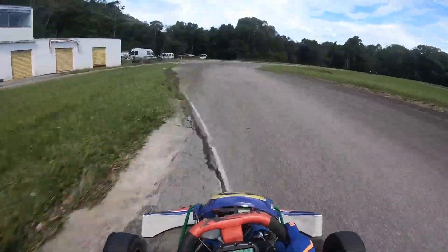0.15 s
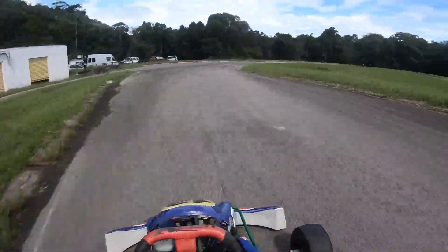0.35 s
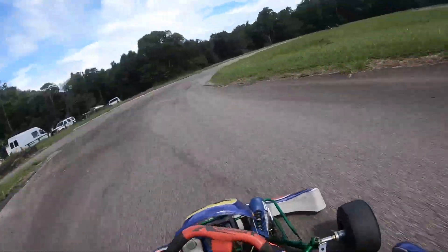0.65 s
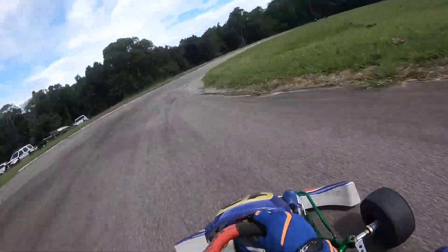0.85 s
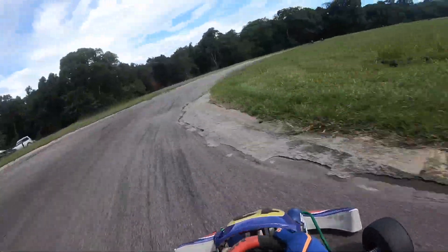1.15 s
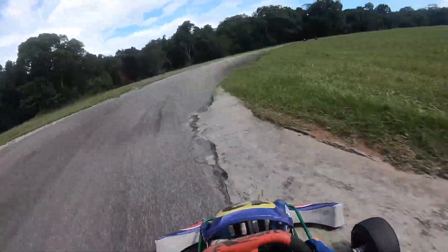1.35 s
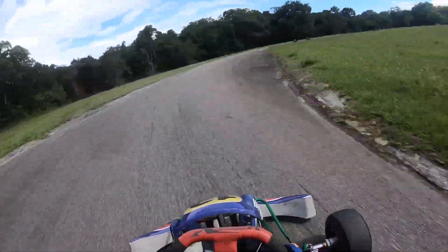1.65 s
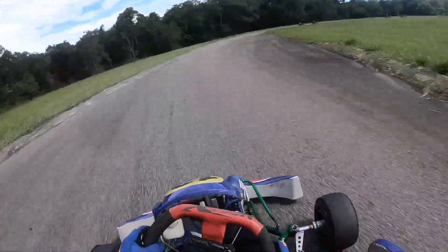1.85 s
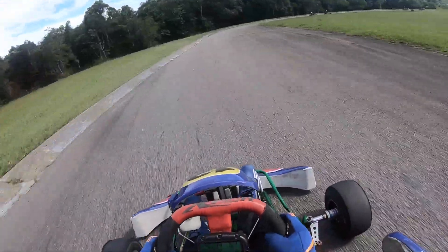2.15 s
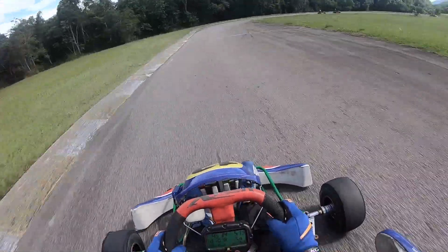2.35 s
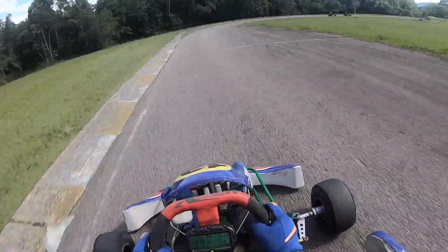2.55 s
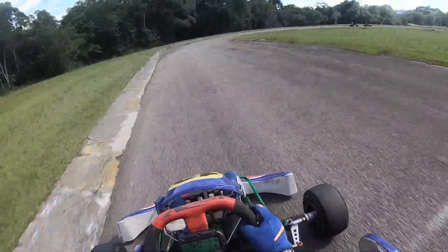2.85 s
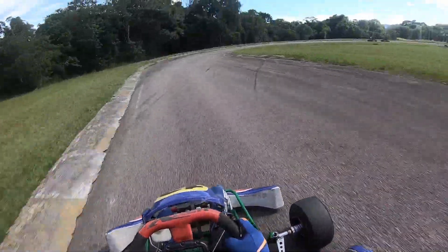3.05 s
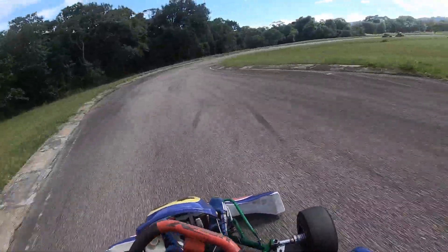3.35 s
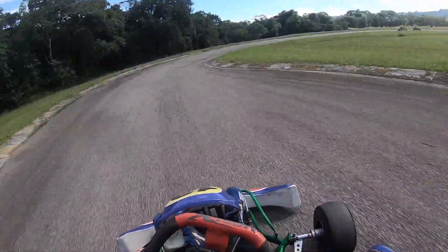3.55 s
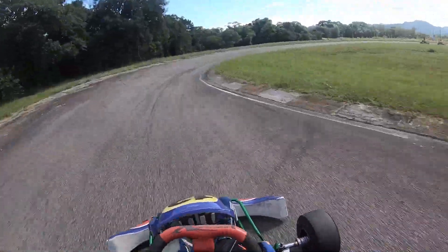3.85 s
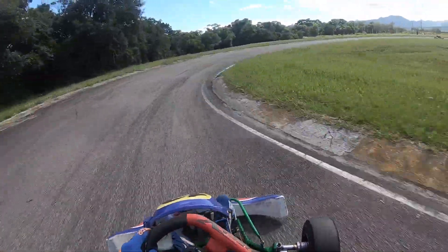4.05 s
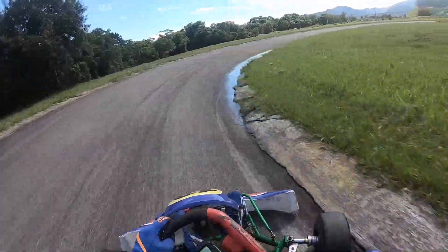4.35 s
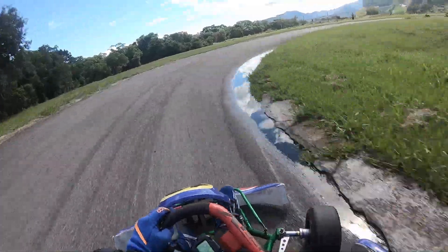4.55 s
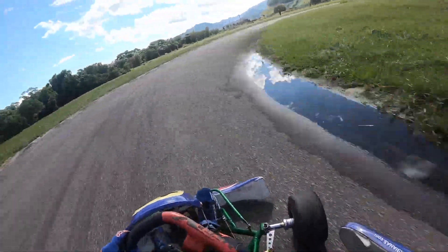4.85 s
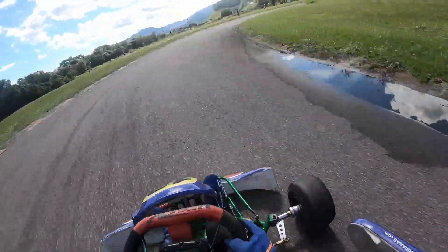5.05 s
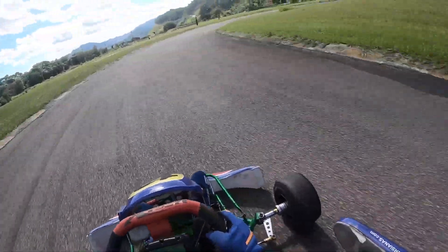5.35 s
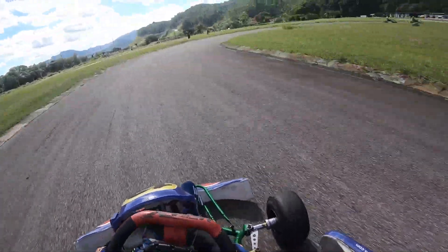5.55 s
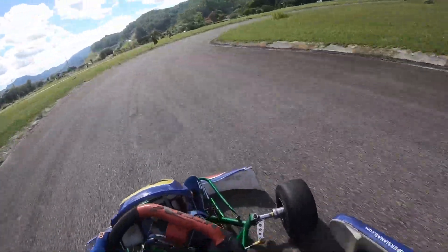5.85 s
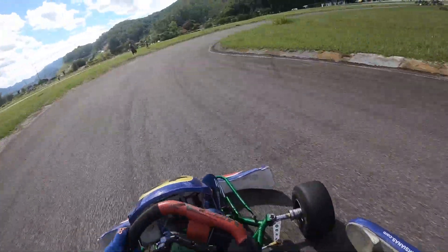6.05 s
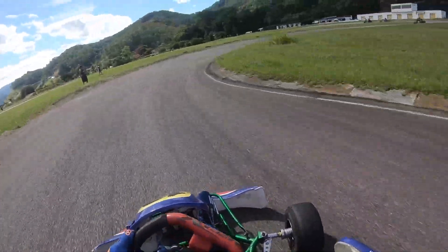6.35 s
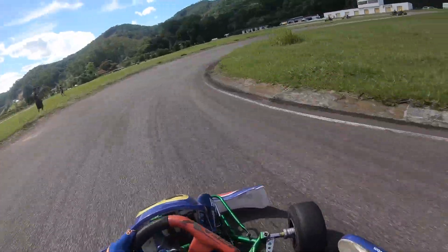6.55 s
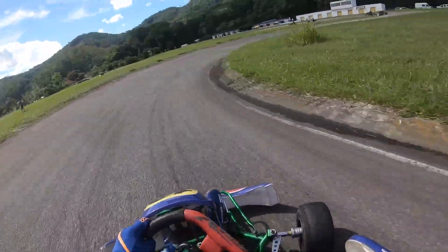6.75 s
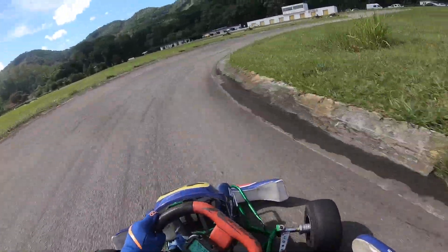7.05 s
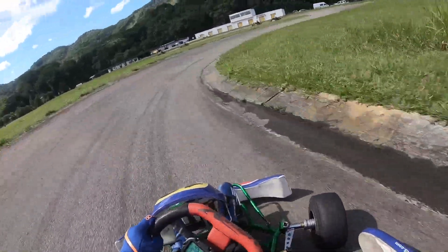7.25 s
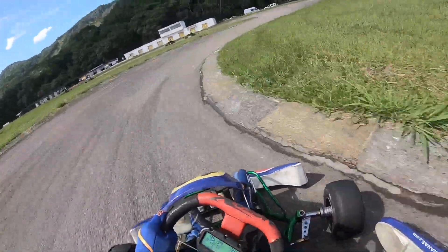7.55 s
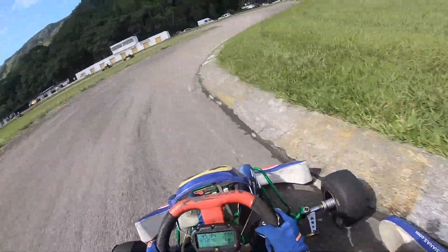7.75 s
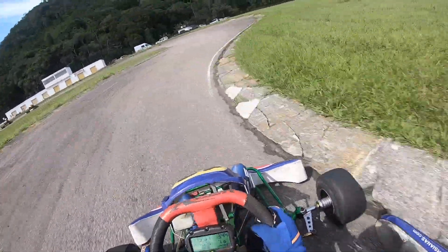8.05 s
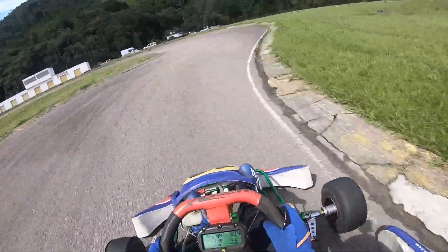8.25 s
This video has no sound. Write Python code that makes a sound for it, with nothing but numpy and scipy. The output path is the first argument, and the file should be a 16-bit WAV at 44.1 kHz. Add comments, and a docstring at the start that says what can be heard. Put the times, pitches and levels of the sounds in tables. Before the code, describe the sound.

A single-cylinder four-stroke kart barks and buzzes outdoors, heard close from the driver's helmet, with gusting wind on the microphone, chassis rattle and faint chain hiss. Around 0.6 seconds the throttle eases and the pitch dips. A few sharp backfires crack between 0.8 and 1.1 seconds, amid thin brake chirps and short tyre squeals and scrapes lasting until 1.4. The engine pulls again from 1.2, with one hard pop at 1.6, and holds a steady buzz while a second kart thumps dully nearby. At 3.3 it backs off into a hollow, booming putter and the revs sink. The tyres chirp at 4.3, and the throttle rasps again from about 4.6 to 5.9. The pitch keeps falling, with two brief throttle blips, and the tyres squeal hoarsely from 6.7 to 7.8. From 7.6 the engine barks again at low revs, with harder rattling over a kerb until the end.

```python
"""A single-cylinder four-stroke kart barks and buzzes on the throttle, heard from the driver's helmet.
Each firing sends a gas pulse through the resonances of pipe and silencer; off the throttle the
silencer's boom dominates. A second kart thumps close by, the frame rattles, the tyres scrub, the chain
hisses and wind buffets the microphone. In the bends friction makes the brake screech and the tyres
squeal. Early on the exhaust pops sharply: a few backfires, then one extra-hard firing on the throttle."""
import sys
import numpy as np
from scipy import signal
from scipy.fft import rfft, irfft, next_fast_len
from scipy.io import wavfile
from scipy.ndimage import uniform_filter1d, minimum_filter1d, map_coordinates

SR = 44100
rng = np.random.default_rng(int(sys.argv[2]) if len(sys.argv) > 2 else 0)


def file_out(sig):
    """Save sig as 16-bit WAV at sys.argv[1]."""
    # one column per channel
    cols = np.atleast_2d(sig).T
    # limit, then scale
    lim = np.clip(cols, -1, 1)
    pcm = np.round(lim * 32767).astype(np.int16)
    wavfile.write(sys.argv[1], SR, pcm)


N = 370881
T = np.arange(N) / SR

# engine speed: (time [s], firing rate [Hz])
FIRING_RATE = [(0.0, 49.79), (0.44, 51.44), (0.74, 48.35), (0.98, 43.11), (1.12, 41.64), (1.48, 44.04),
               (1.72, 42.94), (2.02, 42.68), (2.7, 43.5), (3.2, 45.45), (3.38, 42.69), (3.48, 43.29),
               (4.18, 36.29), (4.61, 35.32), (5.1, 36.31), (5.55, 35.15), (5.79, 36.01), (6.17, 34.6),
               (6.47, 34.55), (6.82, 31.84), (7.14, 31.57), (7.5, 27.25), (7.78, 28.24), (8.41, 26.41)]
CRUISE_HZ = 38.14  # reference firing rate
# pedal presses: (start [s], end [s], throttle opening [0-1])
PEDAL_PRESSES = [(-.2, .45, 0.57), (.43, .64, 0.49), (.55, 1.15, 0.3), (1.22, 3.34, 0.52),
                 (3.52, 3.76, 0.34), (4.6, 5.15, 0.39), (4.98, 5.88, 0.51), (6.24, 6.56, 0.34),
                 (6.88, 7.12, 0.4), (7.62, 8.6, 0.43)]
PRESS_S, LIFT_S, COAST_OPENING = 0.062, 0.091, 0.23
# gas pulse leaving the valve: (frequency [Hz], spectral level [dB])
BLOWDOWN_SPECTRUM = [(20, -49.5), (45, -19.5), (85, 1.5), (130, 1), (180, -2.5), (290, -14), (400, -25.5),
                     (560, -40), (1200, -30.5), (2500, -45.5), (6000, -93)]
# tailpipe resonances: (frequency [Hz], level [dB], t60 [s])
TAILPIPE_MODES = [(496, -27, 0.032), (578, -22, 0.027), (670, -25, .028), (737, -30, 0.03),
                  (933, -29.5, 0.043), (1180, -23.5, 0.01), (1850, -17.5, 0.0037)]
# turbulence at the pulse front: (frequency [Hz], spectral level [dB])
CRACK_SPECTRUM = [(150, 5), (400, 2.5), (800, -3.5), (1200, -3), (1800, 0), (2600, -14.5), (3400, -16),
                  (4400, -10), (6300, -17.5), (7300, -23.5), (8600, -29.5), (11000, -51.5), (14000, -74)]
# header pipe resonances: (frequency [Hz], level [dB], t60 [s])
HEADER_MODES = [(256, 8.5, 0.033), (292, 6.5, 0.031), (340.3, -3.5, 0.1), (388.7, 2.5, 0.057),
                (430.8, 1.5, 0.038), (479.5, -13.5, 0.049)]
# the header's buzz, weaker when coasting: (time [s], level [dB])
BUZZ_LEVEL = [(0, -23), (.45, -22), (.65, -33), (1.1, -32.5), (1.28, -22), (2.2, -21), (3.05, -20),
              (3.22, -20.5), (3.4, -31), (4.2, -34), (5.6, -31.5), (7.5, -37.5), (7.85, -24), (8.41, -22.5)]
# the boom sags as if the engine misses: (start [s], end [s], loss [dB])
BOOM_SAGS = [(.77, .85, 2), (1.11, 1.19, 17), (3.84, 4.14, 3.5), (6.58, 6.83, 5), (7.21, 7.58, 7.5)]
# the boom swells on the overrun: (start [s], end [s], gain [dB])
OVERRUNS = [(.56, 1.15, 2), (3.3, 3.8, 1), (4.22, 4.66, 2)]
BOOM_KNEE_HZ = 35.3  # firing rate above which the boom fades
# gas murmuring in the silencer: (frequency [Hz], spectral level [dB])
FLOW_SPECTRUM = [(60, -42.5), (140, -3.5), (205, -1.5), (235, 2), (280, -16.5), (420, -21), (900, -62.5),
                 (5000, -110)]
# the second kart's engine speed: (time [s], firing rate [Hz])
FOLLOWER_RATE = [(0, 46), (1.2, 43.5), (1.6, 44.2), (2.0, 43.2), (2.3, 42.3), (2.7, 41.0), (3.1, 42.2),
                 (4.2, 38)]
# it draws near: (peak time [s], build-up [s], fade [s], level [dB])
APPROACHES = [(.1, .3, .5, -17.5), (1.5, .2, .25, -14.5), (2.65, 0.21, 0.56, -12)]
# frame vibration: (frequency [Hz], spectral level [dB])
RATTLE_SPECTRUM = [(60, -27), (150, -8.5), (260, 5.5), (400, 4), (560, 2), (800, -2.5), (1300, -8.5),
                   (1900, -9.5), (2500, -17.5), (3400, -26), (5000, -19.5), (8000, -35), (12000, -78)]
# kerbs and broken edging: (start [s], end [s], extra rattle [dB])
KERBS = [(-.2, .65, 1), (1.25, 1.68, 0.5), (2.5, 2.8, 1.5), (3.25, 3.8, 1.5), (7.62, 8.6, 6.5)]
# rubber sliding sideways: (frequency [Hz], spectral level [dB])
SCRUB_SPECTRUM = [(500, -36), (900, -4), (1250, -3.5), (1500, 1.5), (1750, 2.5), (2100, -8.5), (2700, -14),
                  (4000, -26), (9000, -75.5)]
# slides in the bends: (peak time [s], build-up [s], fade [s], relative level [dB])
SLIDES = [(1.35, 0.18, 1, -32), (3.5, 0.22, 0.27, -36.5), (4.32, 0.43, 0.18, -33), (4.8, 0.21, 0.28, -33),
          (7.5, 1.72, 0.62, -34.5)]
# chain hiss: (frequency [Hz], spectral level [dB])
CHAIN_SPECTRUM = [(2000, -14), (3400, -34), (4000, -8), (4600, 0.5), (5400, -1), (6200, -2), (7100, -18),
                  (8300, -24.5), (10000, -36.5), (12000, -52.5), (15000, -89)]
# strength of that hiss: (time [s], relative level [dB])
CHAIN_LEVEL = [(0.0, -46.5), (.33, -45.5), (0.62, -37), (.78, -45.5), (.89, -37.5), (1.03, -44), (1.4, -35),
               (2.0, -34.5), (2.32, -33), (2.58, -35.5), (3.62, -37.5), (4.05, -44.5), (4.25, -43.5),
               (4.33, -38.5), (4.39, -45.5), (5.2, -38.5), (5.8, -39.5), (6.05, -43.5), (6.65, -44.5),
               (7.0, -41), (7.15, -43), (7.52, -43.5), (7.8, -38.5), (8.05, -40.5), (8.41, -40)]
# eddy pressure: (frequency [Hz], spectral level [dB])
WIND_SPECTRUM = [(8, -20.5), (25, -17), (45, -1.5), (90, -4.5), (160, -2.5), (300, -9), (700, -36.5),
                 (2000, -88.5), (8000, -110)]
# the kart heads into the wind: (start [s], end [s], extra wind [dB])
GUSTS = [(-.3, .85, 6), (.85, 2.3, 3), (2.3, 3.5, 5), (3.25, 4.12, 7.5), (3.9, 4.5, 4.5), (7.6, 8.2, 6.5)]
# brake disc screeches: (peak time [s], build-up [s], fade [s], level [dB], pitch [Hz], glide [Hz/s])
BRAKE_SCREECHES = [(.575, .02, 0.069, -48, 8000, -12000), (0.654, .025, 0.035, -39, 6500, 6997),
                   (.745, .04, 0.031, -51, 7500, -2000), (0.874, .02, .015, -43, 6440, 3002),
                   (1.198, .01, .015, -36, 6140, -5000), (1.38, .025, .03, -39, 6450, -3000)]
# a tyre lets go: (peak time [s], build-up [s], fade [s], level [dB], pitch [Hz], glide [Hz/s],
# hoarseness [share of pitch])
SKIDS = [(0.699, 0.046, 0.041, -31, 596, -100, 0.04), (1.0, 0.027, 0.018, -34, 598, 99.5, 0.04),
         (1.25, 0.077, 0.035, -29, 902, -500, 0.094), (1.358, 0.027, 0.053, -31.5, 953, 304, .05),
         (4.31, 0.014, 0.014, -27, 1615, -3000, 0.034), (4.35, 0.012, .02, -30, 1400, -1000, 0.087),
         (6.879, 0.16, 0.23, -35, 1570, 1401, 0.09), (7.2, .12, 0.14, -37.5, 1472, -700, 0.08),
         (7.53, .11, 0.28, -32, 1680, -600, 0.085)]
# tread tearing over asphalt: (frequency [Hz], spectral level [dB])
SCRAPE_SPECTRUM = [(450, -21), (780, 0.5), (1000, 2.5), (1400, -4), (2050, -1), (2400, -20), (4000, -36),
                   (9000, -73.5)]
# front tyres plough at turn-in: (peak time [s], build-up [s], fade [s], level [dB])
SCRAPES = [(1.06, 0.062, 0.044, -27.5), (1.22, 0.047, 0.14, -27)]
# sharp exhaust pops, a few backfires and then one extra-hard firing on the throttle:
# (time [s], burst level [dB], pipe wall frequency [Hz], ring level [dB])
EXHAUST_POPS = [(0.7768, -9.5, 1650, -3), (0.8582, -22, 1800, -34), (0.9301, -10.5, 1820, -1),
                (1.0045, -21, 1800, -34), (1.117, -14, 1590, -28), (1.606, -19, 1300, -19)]
# one such burst: (frequency [Hz], spectral level [dB])
POP_SPECTRUM = [(200, 9), (700, 0), (1300, 1), (2000, 6.5), (2500, -15), (3400, -15), (5000, -9.5),
                (7000, -21.5), (9000, -40.5), (12000, -69), (15000, -84)]


def amp(db):
    """Decibels to amplitude ratio."""
    return 10 ** (np.asarray(db) / 20)


def unit(x):
    """Normalisation to rms 1."""
    return x / np.sqrt(np.mean(x ** 2) + 1e-20)


def curve(rows, at=T):
    """Linear interpolation of (time, value) rows."""
    return np.interp(at, *np.transpose(rows))


def holds(rows, rise, fall, at=T):
    """Trapezoidal envelopes from (start, end, height) rows; the highest counts."""
    return np.max([height * np.clip(np.minimum((at - start) / rise, (end - at) / fall), 0, 1)
                   for start, end, height in rows], axis=0)


def swells(rows):
    """Sum of asymmetric Gaussian envelopes from (peak time, build-up, fade, dB) rows."""
    return sum(amp(db) * np.exp(-((T - peak) / np.where(T < peak, build, fade)) ** 2)
               for peak, build, fade, db in rows)


def wobble(rate):
    """Smooth random modulation: a spline with rate knots a second."""
    return map_coordinates(rng.standard_normal(4096), [T * rate], mode="wrap")


def colour(x, points):
    """Minimum-phase filter through (Hz, dB) points, conserving the power of white noise."""
    size = 8192
    hz, db = np.transpose(points)
    log_hz = np.log(np.fft.rfftfreq(size, 1 / SR) + 1)
    log_gain = np.log(amp(np.interp(log_hz, np.log(hz), db)))
    causal_fold = np.r_[1, np.full(size // 2 - 1, 2), 1, np.zeros(size // 2 - 1)]
    cepstrum = irfft(log_gain) * causal_fold
    response = irfft(np.exp(rfft(cepstrum)))
    return signal.fftconvolve(x, response / np.linalg.norm(response))[:N]


def noise(points):
    """Filtered Gaussian noise of rms 1."""
    return unit(colour(rng.standard_normal(N), points))


def place(times, shapes):
    """Superposition of one row of samples at each start time."""
    index = np.round(times * SR).astype(int)[:, None] + np.arange(shapes.shape[1])
    inside = (index >= 0) & (index < N)
    return np.bincount(index[inside], shapes[inside], N)


def puffs(times, sizes, life_s):
    """Turbulent bursts: whitened noise that swells and dies within a few times life_s."""
    age = np.arange(SR // 50) / SR / life_s
    envelope = age * np.exp(1 - age)
    spectra = rfft(envelope * rng.standard_normal((len(times), len(age))))
    bursts = envelope ** (2 / 3) * irfft(spectra / np.abs(spectra), len(age))
    bursts = bursts * np.linalg.norm(envelope) / np.linalg.norm(bursts, axis=1, keepdims=True)
    return place(times, sizes[:, None] * bursts)


def ringing(modes, attack_s):
    """Free decay of damped (Hz, dB, t60) modes after a smooth onset."""
    t = np.arange(SR // 10) / SR
    onset = 1 - np.exp(-(t / attack_s) ** 2)
    return onset * sum(amp(db - 60 * t / t60) * np.sin(2 * np.pi * hz * t) for hz, db, t60 in modes)


def squeal(hz, wander, rate):
    """Friction tone: a sine under random frequency modulation."""
    pitch = hz * (1 + wander * wobble(rate))
    return np.sin(2 * np.pi * np.cumsum(pitch) / SR)


def pedal(at=T):
    """Engine load: the throttle opening, 0-1."""
    return np.clip(holds(PEDAL_PRESSES, PRESS_S, LIFT_S, at), COAST_OPENING, 1)


def octaves(at=T):
    """Revs in doublings above cruising; with a single gear, road speed is proportional."""
    return np.log2(curve(FIRING_RATE, at) / CRUISE_HZ)


def firings(jitter_s):
    """Four-stroke cycle: one firing every second turn of the crank, never quite on time."""
    cycles = np.cumsum(curve(FIRING_RATE)) / SR - .1
    times = np.interp(np.arange(int(cycles[-1]) + 1), cycles, T)
    return times + jitter_s * rng.standard_normal(len(times))


def exhaust(times, bark_db, rasp_db, crack_db, coast_share, bite_opening):
    """Blowdown: the valve releases a pressure pulse whose steep front rings the tailpipe and cracks."""
    throttle, revs = pedal(times), 2 ** octaves(times)
    scatter_db = 4 * rng.uniform(-1, 1, len(times))
    charge = np.minimum(revs, 1) ** 1.5
    strength = (coast_share + (1 - coast_share) * throttle) * charge
    bark = colour(place(times, (strength * amp(bark_db))[:, None]), BLOWDOWN_SPECTRUM)
    # front and crack grow steeply with throttle, then saturate
    bite = np.tanh((throttle / bite_opening) ** 3)
    tailpipe = ringing(TAILPIPE_MODES, attack_s=.0001)
    rasp = place(times + .00028, (amp(rasp_db) * bite * charge)[:, None] * tailpipe)
    # the turbulent crack is hardest when the engine lugs at low revs
    crack_sizes = bite / revs * amp(crack_db + scatter_db)
    crack = colour(puffs(times - .0004, crack_sizes, life_s=0.0011), CRACK_SPECTRUM)
    return bark + rasp + crack


def header(times):
    """Pipe resonance: the header's modes ring on from one firing to the next and merge into a buzz."""
    rings = np.tile(ringing(HEADER_MODES, attack_s=0.0035), (len(times), 1))
    return amp(curve(BUZZ_LEVEL)) * unit(place(times, rings))


def boom_level(at=T, db_per_octave=-12, load_db=-12.5):
    """The silencer's relative response in dB: greatest when coasting at low revs."""
    above_knee = np.maximum(np.log2(curve(FIRING_RATE, at) / BOOM_KNEE_HZ), 0)
    return db_per_octave * above_knee + load_db * pedal(at) ** 2 * 2 ** octaves(at)


def silencer(times, base_hz, boom_db, flow_db):
    """Cavity resonance: each gas pulse sets the air in the silencer ringing for a few cycles."""
    throttle, rate = pedal(times), curve(FIRING_RATE, times)
    t = np.arange(-SR // 50, SR // 30) / SR
    # under load the push is more abrupt and rings longer; at high revs it shrinks to a thump
    shrink = np.minimum(BOOM_KNEE_HZ / rate, 1) ** 2.16
    rise_s = 0.0079 * np.exp(-1.1 * throttle) * shrink
    fall_s = 0.0044 * (1 + throttle) * shrink
    envelope = np.exp(-.5 * (t / np.where(t < 0, rise_s[:, None], fall_s[:, None])) ** 2)
    # higher revs mean hotter gas and a higher resonance
    heat = np.minimum(rate / BOOM_KNEE_HZ, 1.03)
    detune = 1 + 0.0062 * rng.standard_normal(len(times))
    pitch = base_hz * np.sqrt(heat) * (1 - 0.2 * throttle) * detune
    ring = envelope * np.sin(2 * np.pi * pitch[:, None] * t)
    sag_db = holds(BOOM_SAGS, 0.061, 0.061, times)
    swell_db = holds(OVERRUNS, LIFT_S, LIFT_S, times)
    train_rms = np.sqrt(rate * np.sum(envelope ** 2, axis=1) / SR)
    size = amp(boom_db + boom_level(times) - sag_db + swell_db) / train_rms
    # the pulse arrives one ring period late; uneven burning off the throttle makes it drift
    drift_s = .0004 * COAST_OPENING / throttle * np.interp(times, T, wobble(6))
    boom = place(times + 1 / pitch + drift_s + t[0], size[:, None] * ring)
    # turbulent gas keeps the resonance murmuring between firings
    murmur = amp(flow_db + boom_level() - 20 * pedal()) * noise(FLOW_SPECTRUM)
    return boom + murmur


def follower(hz, width_s):
    """Beating of pulse trains: a second kart's dull thumps slide in and out of step with the first."""
    cycles = np.cumsum(curve(FOLLOWER_RATE)) / SR
    times = np.interp(np.arange(int(cycles[-1])), cycles, T)
    t = np.arange(-SR // 100, SR // 100) / SR
    thump = -np.exp(-.5 * (t / width_s) ** 2) * np.sin(2 * np.pi * hz * t)
    return swells(APPROACHES) * place(times + t[0], np.tile(thump, (len(times), 1)))


def frame(jerk, level_db, db_per_octave):
    """Forced vibration: the frame rattles harder with speed, over kerbs and at each engine jerk."""
    road_db = db_per_octave * octaves() + holds(KERBS, 0.092, 0.092)
    return amp(level_db + road_db + 0.165 * jerk + 1.9 * wobble(130)) * noise(RATTLE_SPECTRUM)


def tyre_scrub(gain_db, straight_db, squeal_db):
    """Sliding friction: the tyres scrub most in bends, off the throttle, and verge on a squeal."""
    rubber = noise(SCRUB_SPECTRUM)
    note = amp(squeal_db + 1.1 * wobble(24)) * squeal(hz=1735, wander=0.066, rate=170)
    slip = swells(SLIDES) + amp(straight_db)
    return slip * amp(gain_db - 3.8 * pedal() + 2.1 * wobble(70)) * (rubber + note)


def chain(jerk, gain_db):
    """Amplitude modulation: the chain's hiss pulses with the engine's jerks."""
    return amp(curve(CHAIN_LEVEL) + gain_db + 1.37 * jerk + 1.6 * wobble(260)) * noise(CHAIN_SPECTRUM)


def wind(level_db, db_per_octave):
    """Turbulent pressure: eddies tumble over the microphone, harder with speed and in gusts."""
    eddies = unit(amp(.6 * wobble(12)) * noise(WIND_SPECTRUM))
    return amp(level_db + db_per_octave * octaves() + holds(GUSTS, 0.19, 0.19)) * eddies


def brake():
    """Friction-excited vibration: pad on disc gives hoarse, gliding screeches."""
    return sum(swells([shape]) * squeal(hz + glide * (T - shape[0]), wander=.035, rate=1100)
               for *shape, hz, glide in BRAKE_SCREECHES)


def skid(flutter_db, grain_db):
    """Stick-slip: rubber grips and lets go, giving hoarse, gliding notes and a broad, rough scrape."""
    notes = sum(swells([shape]) * squeal(hz + glide * (T - shape[0]), hoarseness, rate=450)
                for *shape, hz, glide, hoarseness in SKIDS)
    scrape = swells(SCRAPES) * unit(amp(grain_db * wobble(320)) * noise(SCRAPE_SPECTRUM))
    return amp(flutter_db * wobble(140)) * notes + scrape


def exhaust_pops(wall_t60_s):
    """Impulsive excitation: a backfire or extra-hard firing pops, and the pipe wall rings briefly."""
    times, burst_db = np.transpose(EXHAUST_POPS)[:2]
    bursts = colour(puffs(times, amp(burst_db), life_s=.0008), POP_SPECTRUM)
    rings = [ringing([(hz, db, wall_t60_s)], attack_s=0.001) for _, _, hz, db in EXHAUST_POPS]
    return bursts + place(times, np.array(rings))


def scene():
    """Superposition of engines, running gear and wind at close range, in one channel."""
    times = firings(jitter_s=.00003)
    jerk = np.cos(2 * np.pi * np.interp(T, times, np.arange(len(times))))  # one cycle per firing
    engines = exhaust(times, bark_db=16.5, rasp_db=1, crack_db=-20, coast_share=0.017, bite_opening=0.46)
    engines += header(times)
    engines += silencer(times, base_hz=213.1, boom_db=-10, flow_db=-19)
    engines += follower(hz=177, width_s=0.0014)
    gear = frame(jerk, level_db=-32, db_per_octave=16)
    gear += tyre_scrub(gain_db=-3, straight_db=-46, squeal_db=-10)
    gear += chain(jerk, gain_db=-0.5)
    cornering = skid(flutter_db=3, grain_db=0.5) + brake()
    pops = exhaust_pops(wall_t60_s=0.0077)
    return (engines + gear + cornering + pops + wind(level_db=-25, db_per_octave=4))[None]


def record(dry):
    """Peak and band limiting: a smoothed gain ducks the highest peaks; the top treble is cut off."""
    ceiling, top_hz = .8, 15700
    needed_gain = minimum_filter1d(ceiling / np.maximum(np.abs(dry), ceiling), size=441)
    limited = dry * uniform_filter1d(uniform_filter1d(needed_gain, size=221), size=221)
    size = next_fast_len(N + SR // 2)
    passband = np.fft.rfftfreq(size, 1 / SR) < top_hz
    return irfft(rfft(limited, size) * passband, size)[..., :N]


dry = scene()
out = record(dry)
file_out(out)
```